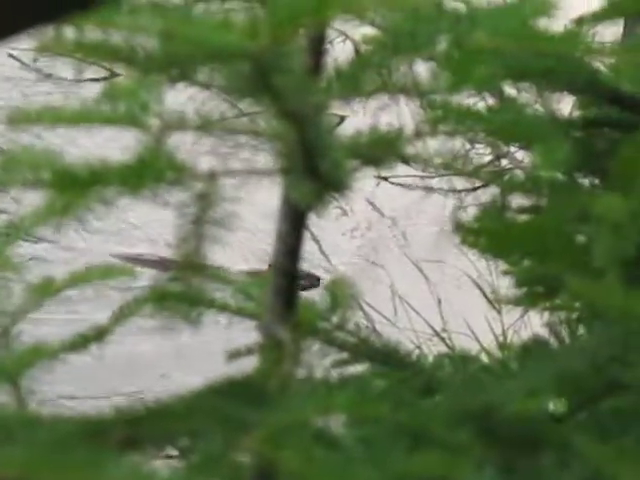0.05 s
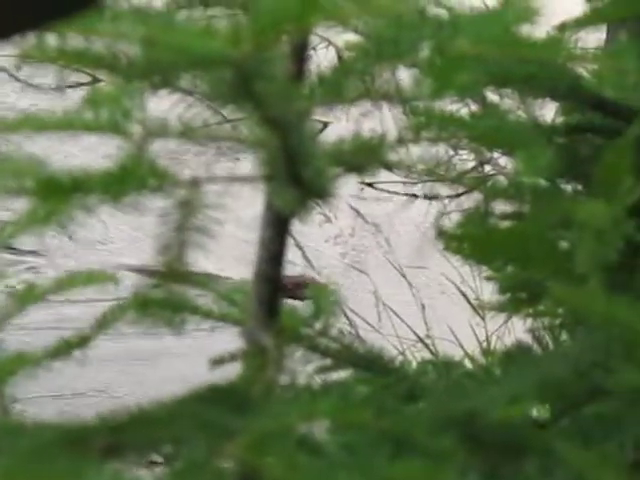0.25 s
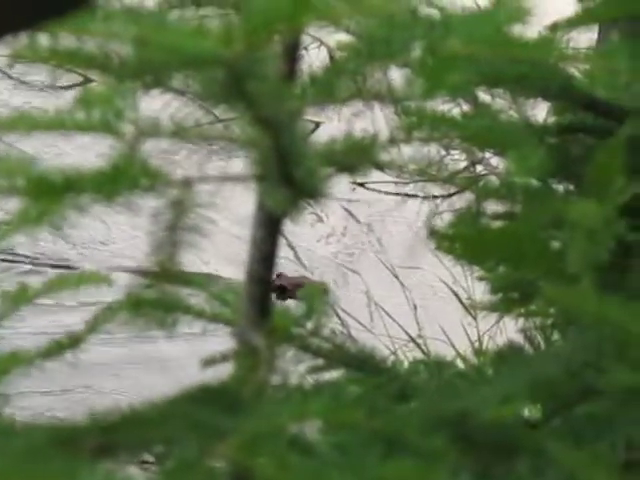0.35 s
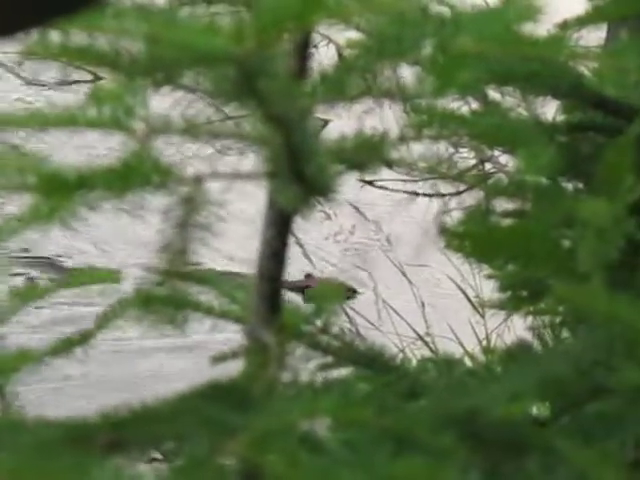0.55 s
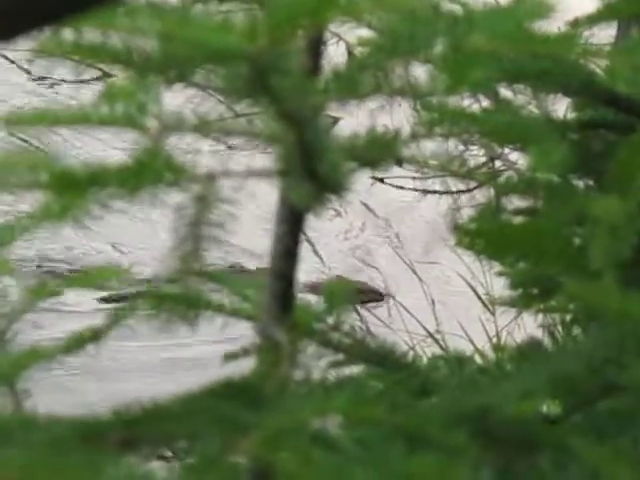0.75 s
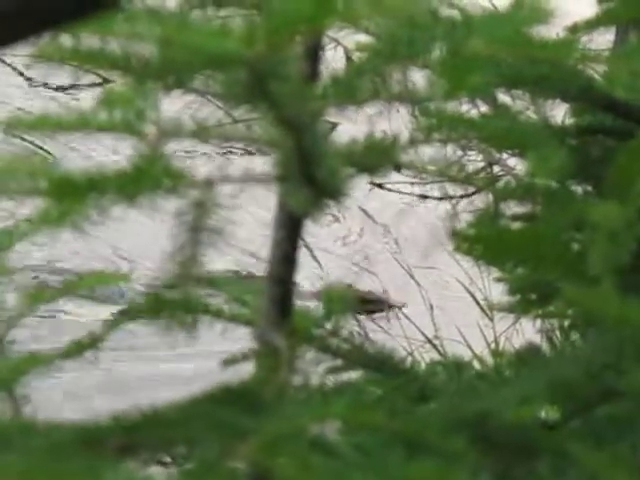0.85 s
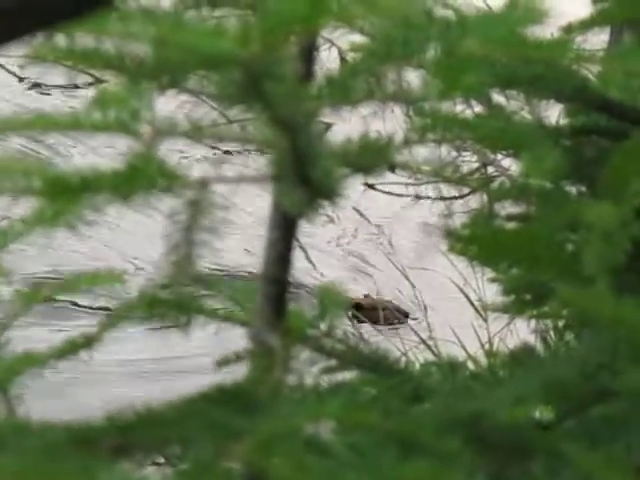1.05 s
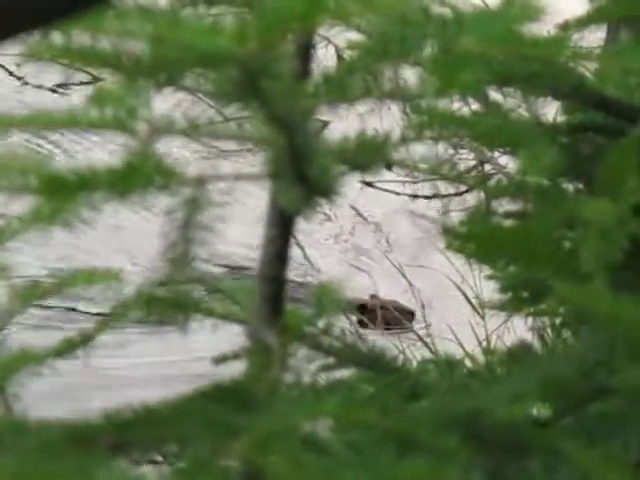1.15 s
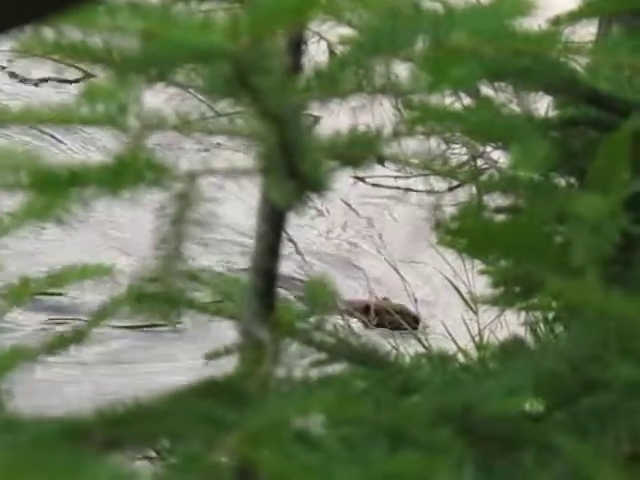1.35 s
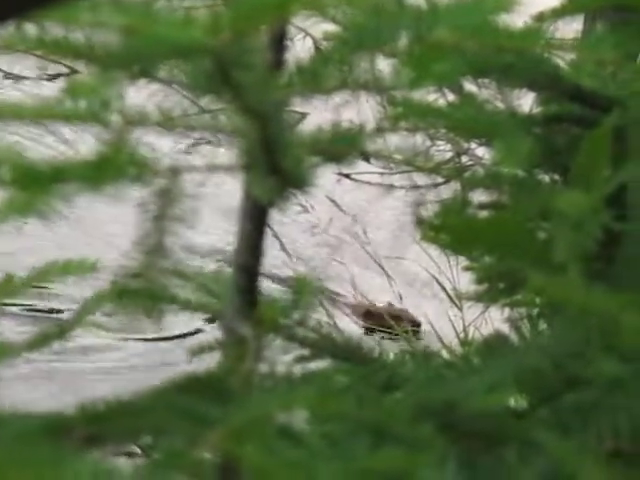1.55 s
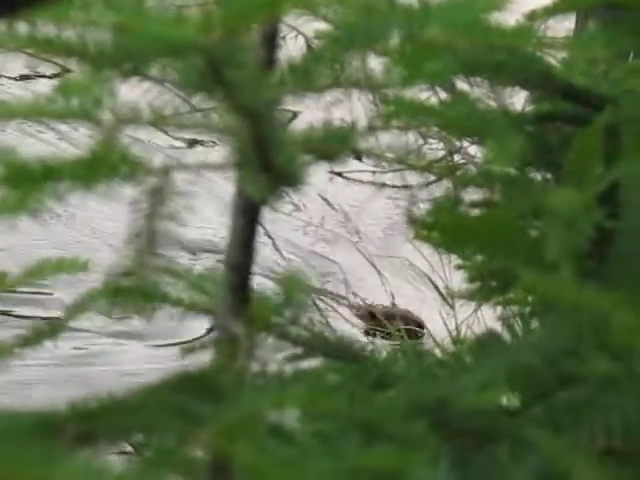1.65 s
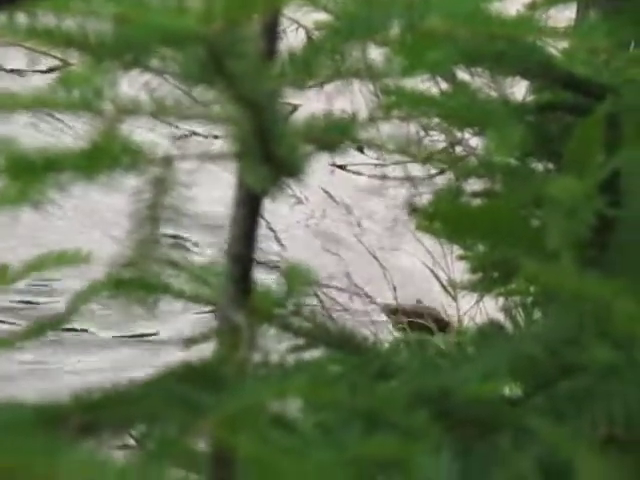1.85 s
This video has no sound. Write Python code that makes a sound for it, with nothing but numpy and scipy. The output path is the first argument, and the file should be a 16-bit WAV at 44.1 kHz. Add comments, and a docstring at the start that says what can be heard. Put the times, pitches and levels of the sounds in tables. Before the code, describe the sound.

A small bird gives two short falling chirps, then a few more, in trees by a lake. A sharp click close to the microphone and a soft distant knock come between, over steady hiss and low handling rumble.

```python
"""On a lake shore, a small bird gives short falling chirps from the trees. Most have two voices at once,
one from each side of its voice box. Two tiny pings sound in a row; later, far birds add thin whistles.
Close by, a hand-held camera clicks once sharply, its body ringing briefly, and ticks faintly.
A soft knock comes from farther off. Under it all lie a low handling rumble, a faint hum and a hiss."""
import sys
import numpy as np
from scipy import signal
from scipy.fft import rfft, irfft
from scipy.io import wavfile

SR = 44100
rng = np.random.default_rng(int(sys.argv[2]) if len(sys.argv) > 2 else 0)


def to_wav(s):
    """Save 16-bit WAV."""
    ch = np.atleast_2d(s).T  # columns
    pcm = np.round(np.clip(ch, -1, 1) * 32767)  # PCM
    wavfile.write(sys.argv[1], SR, pcm.astype(np.int16))


N = 83790

# Notes of the bird's upper voice: (time [s], length [s], starting pitch [Hz], level [dB])
UPPER_NOTES = [(.077, 0.048, 4320, -48), (.203, 0.05, 4220, -54.5), (1.043, 0.055, 4460, -49),
               (1.172, 0.05, 4280, -49.5)]
# Notes of its lower voice: (time [s], length [s], starting pitch [Hz], level [dB])
LOWER_NOTES = [(.088, 0.05, 3100, -55.5), (.212, 0.031, 3100, -54), (.917, 0.034, 3220, -51),
               (1.047, 0.053, 3510, -51.5), (1.177, 0.054, 3186, -52.5)]
# Echoes off the ground and nearby trunks: (delay [s], relative level [dB])
ECHOES = [(.0085, -9.5), (0.0149, -25), (0.025, -27)]
# Two tiny pings (the first two rows), then whistles of far birds:
# (time [s], length [s], pitch [Hz], level [dB], wobble [share of pitch])
PINGS_AND_WHISTLES = [(0.343, 0.0099, 2620, -54.5, 0.0085), (0.354, 0.009, 2620, -59, .01),
                      (.775, 0.025, 3700, -64, .07), (1.13, 0.21, 2650, -66, 0.031),
                      (1.282, 0.2, 2730, -67.5, 0.0081), (1.5, 0.19, 4850, -75.5, .012)]
# Tones the camera body rings with: (pitch [Hz], relative level [dB], time to fade by 60 dB [s])
BODY_TONES = [(730, -20.5, .012), (1093, -15, 0.01), (1490, -14, 0.0064), (2020, -34.5, 0.027),
              (2560, -20, 0.019), (3300, -39, 0.019), (3590, -26, 0.0082), (4764, -31, 0.011),
              (5860, -36, 0.0061), (7080, -44, 0.012), (8530, -31.5, 0.0037)]
# Camera clicks: (time [s], relative level [dB], muffled above [Hz])
CLICKS = [(0.2247, 0.5, 9000), (0.2499, -31, 2470), (0.2563, -21, 1090), (0.745, -40.5, 7000)]
# Tiny high ticks: (time [s], level [dB])
TICKS = [(.080, -50), (0.2355, -56), (.2438, -53), (0.2482, -50), (.2514, -27.5), (.299, -47),
         (.612, -49.5), (.744, -51)]
# Tones the knock rings with: (pitch [Hz], level [dB], time to fade by 60 dB [s])
KNOCK_TONES = [(347.6, -61.5, 0.83), (770, -53.5, 0.056)]
# Tones of the hum: (pitch [Hz], average level [dB])
HUM_TONES = [(73, -70.5), (146, -80), (218.5, -75.5), (291, -79.5)]
# How strong each noise is from bass to treble: (frequency [Hz], relative level [dB])
CRACK_COLOUR = [(150, -6), (420, -3), (2200, -12), (4200, -1), (6500, -14), (9000, -9), (11000, -34),
                (15500, -48)]
SHUDDER_COLOUR = [(20, -14), (60, 6.5), (150, -10.5), (400, 0), (700, -1.5), (1500, -19), (5000, -42)]
TICK_COLOUR = [(300, -40), (7000, -30), (8700, 0), (11300, 0), (13000, -12), (16000, -17)]
KNOCK_COLOUR = [(30, 6), (60, 18), (130, -10), (400, -9), (760, -4), (1000, -4), (1450, -9), (2000, -24),
                (2700, -6), (4500, -32), (7000, -29), (9800, -17), (15000, -44)]
HISS_COLOUR = [(60, -13.5), (110, 1), (200, -1.5), (300, -5), (450, -6.5), (700, -7.5), (1100, -8.5),
               (1600, -12), (2100, -13), (2700, -11.5), (3300, -14.5), (5000, -16), (7000, -17.5),
               (9300, -19), (11500, -22.5), (13500, -24.5), (15800, -28.5)]
RUMBLE_COLOUR = [(8, -15.5), (18, 11.5), (32, -5.5), (48, -6.5), (62, -13), (75, -7), (95, -24), (160, -38),
                 (400, -91)]


def bird():
    """Two voices sound together and make weak extra tones; the ground and trees throw the song back."""
    high = voice(UPPER_NOTES, fall=5.5, bend=71.8, skew=0.63)
    low = voice(LOWER_NOTES, fall=11.0, bend=-4, skew=0.83)
    strength = abs(high) + abs(low) + 1e-9
    # Multiplying complex tones adds their pitches; conj() subtracts one instead.
    overtones = filtered(low * (low + high) / strength, 5060, "low", order=4)
    mixing_tone = 2 * high ** 2 * low.conj() / (strength * (abs(low) + abs(high) / 2 + 1e-9))
    song = (high + low + amp(-9) * overtones + 2 * amp(-18) * mixing_tone).real
    out = song + amp(-13) * scatter(song, t60=0.49)
    for delay, db in ECHOES:
        add(out, delay, amp(db) * song)
    return out


def voice(notes, fall, bend, skew):
    """One side of the voice box, as a complex tone: each note swells and fades while it slides down."""
    out = np.zeros(N, complex)
    waver, flutter_db = 0.0087 * drift(150), 1.5 * drift(140)
    for start, length, hz, db in notes:
        t = np.arange(0, length, 1 / SR)
        at = round(start * SR) + np.arange(len(t))
        octaves_down = fall * t + bend * t ** 2
        pitch = hz * 2 ** -octaves_down * (1 + waver[at])
        swell = abs(np.sin(np.pi * (t / length) ** skew)) ** 1.07  # skew under 1 peaks early
        tone = np.exp(2j * np.pi * np.cumsum(pitch) / SR)
        add(out, start, amp(db + flutter_db[at]) * swell * tone)
    return out


def camera_clicks():
    """Each click cracks, sets the camera body ringing and leaves a low shudder; soft ones are duller."""
    t, out = np.arange(SR // 5) / SR, np.zeros(N)
    ring = sum((-1) ** k * amp(db) * dying(t, t60) * np.sin(2 * np.pi * hz * t)
               for k, (hz, db, t60) in enumerate(BODY_TONES))
    rise = 1 - np.exp(-t / 0.00044)
    ring = filtered(ring * rise, 480, "high", order=3)
    crack = amp(-36.5) * dying(t, t60=0.0095) * noise(CRACK_COLOUR)[:len(t)]
    swell = dying(abs(t - 0.03), t60=0.11)  # peaks 0.03 s after the crack
    shudder = amp(-52.5) * swell * noise(SHUDDER_COLOUR)[:len(t)]
    for start, db, cutoff_hz in CLICKS:
        add(out, start, amp(db) * filtered(ring + crack + shudder, cutoff_hz, "low", order=1))
    return out + amp(-23.5) * scatter(out, t60=0.13)


def camera_ticks():
    """Each tick is a very short burst of high fizz."""
    t, out = np.arange(SR // 50) / SR, np.zeros(N)
    fizz = noise(TICK_COLOUR)
    burst = np.minimum(t / 0.00052, 1) * dying(t, t60=0.0029)
    for start, db in TICKS:
        add(out, start, amp(db) * burst * fizz[round(start * SR):][:len(t)])
    return out


def far_knock():
    """A dull, hollow blow leaves a soft tail of noise and two ringing tones."""
    t, out = np.arange(N) / SR, np.zeros(N)
    fade = dying(t, t60=0.053) + amp(-3.5) * dying(t, t60=0.31)
    blow = amp(-51.5) * noise(KNOCK_COLOUR) * fade
    ring = sum(amp(db) * dying(t, t60) * np.sin(2 * np.pi * hz * t) for hz, db, t60 in KNOCK_TONES)
    rise = np.minimum(t / 0.0033, 1)
    add(out, s=0.61, sound=(blow + ring) * rise)
    return out


def pings_and_whistles():
    """Two tiny ringing clicks, then faint wavering whistles of far birds; all echo softly."""
    out, waver = np.zeros(N), drift(120)
    for start, length, hz, db, wobble in PINGS_AND_WHISTLES:
        t = np.arange(0, length, 1 / SR)
        pitch = hz * (1 + wobble * waver[round(start * SR):][:len(t)])
        swell = np.sin(np.pi * t / length)
        add(out, start, amp(db) * swell * np.sin(2 * np.pi * np.cumsum(pitch) / SR))
    return out + amp(-19) * scatter(out, t60=0.5)


def background():
    """A steady hiss, the low rumble of hands on the camera and a faint, wavering hum."""
    hiss = amp(-62 + 0.67 * drift(2.7)) * noise(HISS_COLOUR)
    rumble = amp(-56.5 + 0.15 * drift(1.7)) * noise(RUMBLE_COLOUR)
    uneven_time = np.cumsum(1 + 0.0056 * drift(2.9)) / SR  # makes the hum's tones waver together
    hum = np.zeros(N)
    for hz, db in HUM_TONES:
        level = amp(db + 1.84 * drift(4))
        hum += level * np.sqrt(2) * np.sin(2 * np.pi * (hz * uneven_time + rng.random()))
    return hiss + rumble + hum


def amp(db):
    """Turns decibels into a number to multiply by."""
    return 10 ** (np.asarray(db) / 20)


def unit(x):
    """Scales a signal to an average strength (rms) of 1."""
    return x / np.sqrt(np.mean(x ** 2) + 1e-20)


def add(mix, s, sound):
    """Mixes a sound in, starting at s seconds."""
    part = mix[max(round(s * SR), 0):][:len(sound)]
    part += sound[:len(part)]


def noise(colour):
    """Noise of strength 1, shaped from bass to treble by a colour table."""
    hz, db = np.transpose(colour)
    f = np.fft.rfftfreq(N, 1 / SR)
    shape = amp(np.interp(np.log(f + 1), np.log(hz + 1), db))
    return unit(irfft(rfft(rng.standard_normal(N)) * shape, N))


def drift(rate_hz):
    """A random wobble of strength 1, moving up to about rate_hz times a second."""
    f = np.fft.rfftfreq(N, 1 / SR)
    return unit(irfft(rfft(rng.standard_normal(N)) * np.exp(-(f / rate_hz) ** 2) * (f > 0), N))


def dying(t, t60):
    """Fades by 60 dB every t60 seconds."""
    return np.exp(-np.log(1000) * t / t60)


def filtered(x, hz, kind, order):
    """Keeps the "low" or "high" side of hz; a higher order cuts more steeply."""
    return signal.sosfilt(signal.butter(order, min(hz, SR / 2 - 100), kind, fs=SR, output="sos"), x)


def scatter(x, t60):
    """A fading blur of echoes thrown back by the surroundings."""
    t = np.arange(SR) / SR
    tail = rng.standard_normal(SR) * dying(t, t60) * np.minimum(t / 0.0044, 1)
    return signal.fftconvolve(x, tail / np.linalg.norm(tail))[:N]


def scene():
    """Adds all the sounds together in one channel."""
    mix = background() + bird() + pings_and_whistles() + camera_clicks() + camera_ticks() + far_knock()
    return mix[None]


def record(dry):
    """Cuts away the highest treble, above 15800 Hz."""
    treble_cut = signal.firwin(511, 15800, window=("kaiser", 9), fs=SR)
    return signal.oaconvolve(dry, treble_cut[None], "same")


dry = scene()
out = record(dry)
to_wav(out)
```